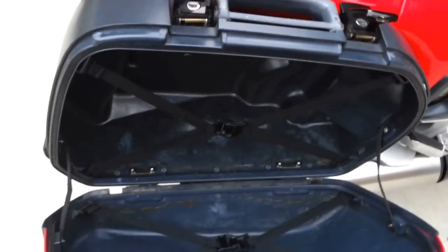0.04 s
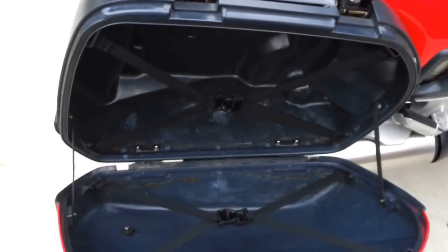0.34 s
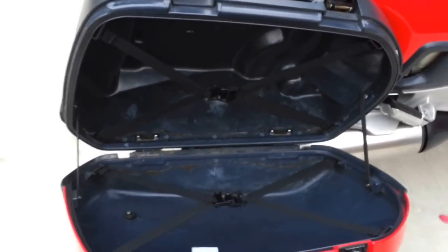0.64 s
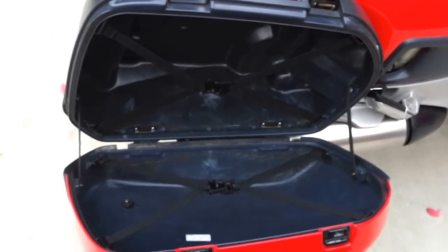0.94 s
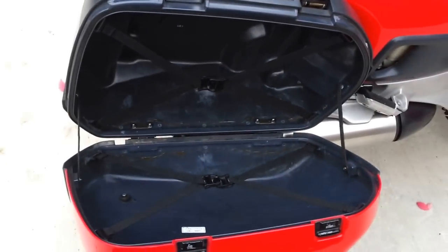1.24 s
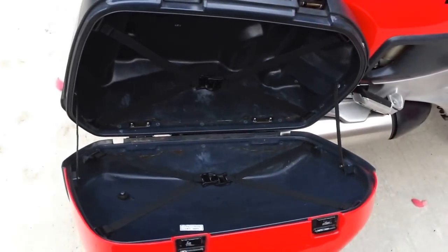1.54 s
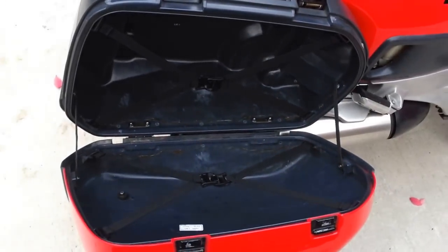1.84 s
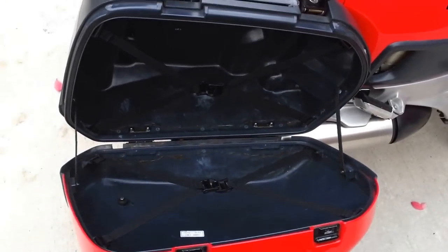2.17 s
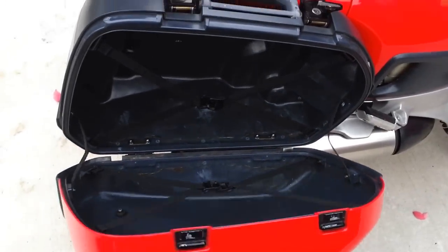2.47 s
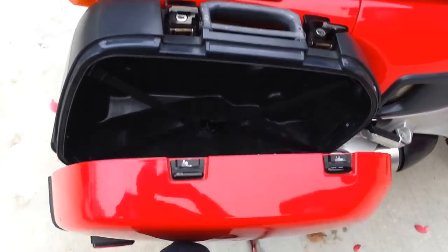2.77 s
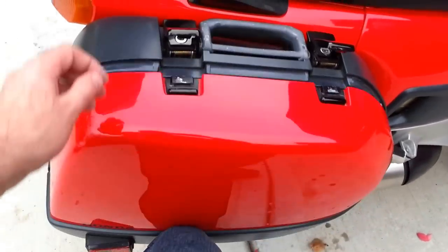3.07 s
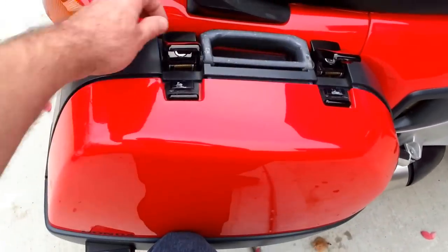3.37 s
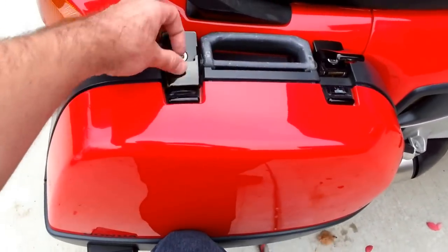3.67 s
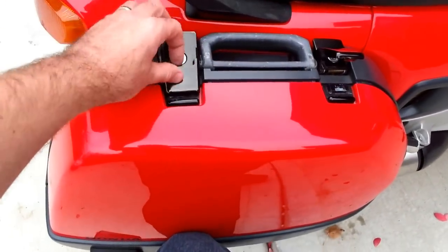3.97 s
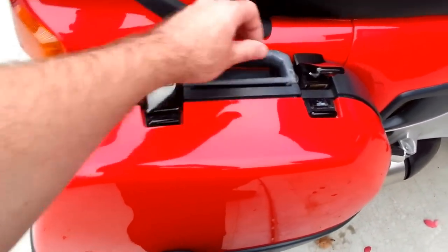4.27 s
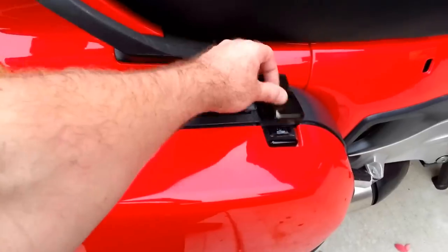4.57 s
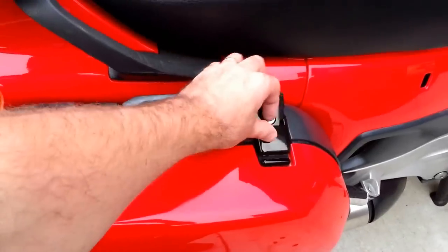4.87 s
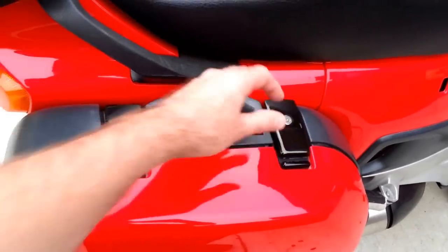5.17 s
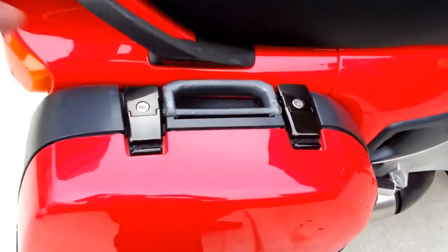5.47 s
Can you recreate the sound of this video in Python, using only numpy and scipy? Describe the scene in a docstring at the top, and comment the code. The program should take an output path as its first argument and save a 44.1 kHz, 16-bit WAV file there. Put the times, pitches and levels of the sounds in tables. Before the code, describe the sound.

A faint outdoor hum and thin hiss run throughout, with soft clothing rustle coming and going. A loose latch gives two tiny clacks at about 0.4 and 1.1 seconds. From 1.8 to 2 seconds the hollow lid of a hard plastic motorcycle saddlebag bumps, with a low boom and a cluster of ticks. It ticks and thuds again around 2.7 seconds as it swings up, then knocks shut with sharp clacks at 3.3 to 3.4 seconds. A metal latch rattles lightly and snaps tight at 3.6 seconds. The second latch clacks and rattles from 4.3 seconds and snaps home at about 4.6. These two snaps are the loudest sounds, overloading the microphone, each with a brief metallic buzz. The bag is an arm's length away, slightly left, and each blow has a short after-ring. Only rustle and hum remain until about 5.5 seconds.

```python
"""First come a faint outdoor hum and hiss, rustling clothes and two tiny clacks of a loose latch. Then, an
arm's length away, the hollow lid of a hard plastic motorcycle saddlebag is bumped, swung up and knocked shut,
booming and ticking. Each of two metal latches is hooked on, rattles, and snaps tight so loudly that its peaks
are flattened. Every blow is a crack, a quickly dying burst of noise and a few ringing tones; the bike and the
walls nearby add a short after-ring."""
import sys
import numpy as np
from scipy import signal
from scipy.fft import rfft, irfft, next_fast_len
from scipy.io import wavfile

SR = 44100
rng = np.random.default_rng(int(sys.argv[2]) if len(sys.argv) > 2 else 0)


def master(y):
    """Save y as 16-bit WAV."""
    cut = np.clip(np.atleast_2d(y).T, -1, 1)
    pcm = np.round(cut * 32767)  # scale
    wavfile.write(sys.argv[1], SR, pcm.astype(np.int16))


N = 243247

EDGES = np.geomspace(28, 16000, 28)   # borders of the frequency bands [Hz]
CENTRES, WIDTHS = np.sqrt(EDGES[1:] * EDGES[:-1]), np.diff(EDGES)
BANK = [signal.butter(2, pair, "band", fs=SR, output="sos") for pair in zip(EDGES, EDGES[1:])]
BASS_HZ, TREBLE_HZ, SHADOW_HZ = 1040, 5200, 1040   # bass ends, treble starts, far side starts to dull
MIDDLING_DB, HALVING_DB = -34, 46   # a medium blow; one this much harder rings half as long


def from_db(db):
    """Turn decibels into a gain to multiply by."""
    return 10 ** (np.asarray(db) / 20)


def at_hz(points, hz):
    """Read a table of (frequency, value) at any frequency, gliding between its rows."""
    frequencies, values = np.array(points).T
    return np.interp(np.log(hz), np.log(frequencies), values)


def above(hz, corner_hz):
    """A smooth step from 0 below the corner frequency to 1 above it."""
    return 1 / (1 + (corner_hz / hz) ** 6)


def dying(t, ring_s):
    """A fade that drops 60 dB in ring_s seconds, the ring time."""
    return np.exp(-np.log(1000) * t / ring_s)


def swell(peak_s, rise_s, fall_s):
    """A gain that rises from 0 to 1 and falls back, in straight lines."""
    return np.interp(np.arange(N) / SR, [peak_s - rise_s, peak_s, peak_s + fall_s], [0, 1, 0])


def wavering(depth_db, count):
    """A gain that wanders through count random values."""
    gains = from_db(depth_db * rng.standard_normal(count))
    return np.interp(np.linspace(0, count - 1, num=N), np.arange(count), gains)


def linger(power, time_s):
    """Smear energy over the time that follows, fading as it goes."""
    kept = np.exp(-1 / (time_s * SR))
    return signal.lfilter([1 - kept], [1, -kept], power + 1e-18)


def unit_energy(x):
    """Scale a stereo sound to an average energy of 1 per channel."""
    return x / np.sqrt(np.sum(x ** 2) / 2 + 1e-20)


def band_noise(k, likeness, size):
    """Stereo noise in band k; a likeness near 1 sounds the same in both ears."""
    run_in = 2000   # samples for the filter to settle
    mid, side = signal.sosfilt(BANK[k], rng.standard_normal((2, size + run_in)))[:, run_in:]
    alike = np.clip(at_hz(likeness, CENTRES[k]), -.99, .99)
    return np.sqrt(1 + alike) * mid + np.sqrt(1 - alike) * side * np.array([[1], [-1]])


def coloured(gain):
    """Stereo noise of average power 1, its tone shaped by gain(hz)."""
    size = next_fast_len(N, real=True)
    hz = np.fft.rfftfreq(size, 1 / SR) + 1
    shaped = rfft(rng.standard_normal((2, size))) * gain(hz)
    return unit_energy(irfft(shaped, size)[:, :N]) * np.sqrt(N)


def add(out, sound, time_s):
    """Mix a sound in at the given time."""
    start = round(time_s * SR)
    out[:, start:start + sound.shape[1]] += sound[:, :N - start]


# how alike both ears hear sound from all around: (frequency [Hz], likeness [-1 to 1])
ALL_AROUND_LIKENESS = [(60, 0.96), (290, 0.86), (640, 0.35), (1400, -0.23), (3000, 0.15), (14000, -0.097)]
# tone of the outdoor air: (frequency [Hz], relative level [dB per Hz])
OUTDOOR_COLOUR = [(15, -74), (25, -53.5), (54, -10), (145, -6.5), (228, -3), (340, -4.5), (368, -10.5),
                  (455, -6.5), (579, -14), (910, -18), (1010, -19.5), (1720, -25.5), (2250, -26.5),
                  (5130, -37.5), (14500, -37.5)]
def hum_and_hiss(hum_db, hiss_db):
    """A distant hum wavers a little under a thin, steady hiss."""
    hum, hiss = 0, 0
    for k, hz in enumerate(CENTRES):
        noise = unit_energy(band_noise(k, ALL_AROUND_LIKENESS, size=N))
        band = from_db(at_hz(OUTDOOR_COLOUR, hz)) * np.sqrt(WIDTHS[k]) * noise
        high = above(hz, corner_hz=1303)
        hum = hum + (1 - high) * band * wavering(depth_db=1.1, count=60)
        hiss = hiss + high * band
    return (from_db(hum_db) * unit_energy(hum) + from_db(hiss_db) * unit_energy(hiss)) * np.sqrt(N)


# dull swells of noise: (peak time [s], rise [s], fall [s], level [dB], centre pitch [Hz])
DULL_SWELLS = [(1.0, 0.4, 0.26, -51.5, 295), (2.1, 0.23, .55, -43.5, 257), (2.3, 0.43, 0.55, -49, 520),
               (4.78, 0.32, 0.49, -46, 252), (5.45, 1, 0.5, -53.5, 500)]
def low_swells(width_octaves):
    """Soft humps of low noise come and go, alike in both ears."""
    out = 0
    for peak_s, rise_s, fall_s, level_db, centre_hz in DULL_SWELLS:
        noise = coloured(lambda hz: np.exp(-(np.log2(hz / centre_hz) / width_octaves) ** 2))[0]
        out = out + from_db(level_db) * swell(peak_s, rise_s, fall_s) * noise
    return out


# tone of rubbing cloth: (frequency [Hz], relative level [dB per Hz])
CLOTH_COLOUR = [(300, -30), (700, 0.5), (1300, -3), (2400, 0), (3000, -0.5), (3700, -0.5), (4250, -4),
                (4900, -5.5), (6000, -16), (14000, -24)]
# the person's movements: (peak time [s], rise [s], fall [s], rubbing level [dB], swish level [dB])
BODY_MOVES = [(.05, 0.34, 0.57, -51, -64), (2.78, 1, 0.84, -54, -57.5), (3.92, 0.67, 0.47, -53.5, -59),
              (4.74, 0.21, .3, -51, -55.5), (5.43, 0.56, 0.5, -47, -63)]
def clothes():
    """Cloth slides in small uneven catches under a fine swish; each move swells and fades."""
    rubbing = coloured(lambda hz: from_db(at_hz(CLOTH_COLOUR, hz))) * wavering(depth_db=2.5, count=450)
    swish = coloured(lambda hz: above(hz, corner_hz=6800))
    return sum(swell(peak_s, rise_s, fall_s) * (from_db(rub_db) * rubbing + from_db(swish_db) * swish)
               for peak_s, rise_s, fall_s, rub_db, swish_db in BODY_MOVES)


# how long the bike and the walls nearby ring on: (frequency [Hz], ring time [s])
AFTER_RING_TIMES = [(150, 0.5), (400, 0.43), (1500, 0.33), (4500, 0.31), (12000, 0.2)]
# how much sound they send back: (frequency [Hz], level [dB])
AFTER_RING_LEVELS = [(100, -10.5), (300, -11), (700, -13.5), (1800, -13), (4500, -18.5), (7000, -17),
                     (13000, -18.5)]
def after_ring(sound, build_s):
    """The bike and the walls send each blow back as a wash that builds up and dies away."""
    out, mono = 0, sound.mean(axis=0) + 1e-18
    lowest_hz = AFTER_RING_LEVELS[0][0]
    for k, hz in enumerate(CENTRES):
        if hz > lowest_hz:
            power = linger(signal.sosfilt(BANK[k], mono) ** 2, build_s)
            power = linger(power, at_hz(AFTER_RING_TIMES, hz) / np.log(1e6))
            wash = unit_energy(band_noise(k, ALL_AROUND_LIKENESS, size=N))
            out = out + from_db(at_hz(AFTER_RING_LEVELS, hz)) * np.sqrt(N * power) * wash
    return out * wavering(depth_db=1.5, count=1100)   # few surfaces outdoors: echoes come in clumps


# A blow is (time [s], level [dB], extra bass [dB], extra treble [dB], ring length [factor],
# left over right [dB], pitch of the struck spot [Hz], extra level of that spot [dB]).
def strength(blow, hz):
    """Left and right gain of a blow at one frequency; only high sounds are shadowed on the right."""
    level_db, bass_db, treble_db, _, left_db = blow[1:6]
    tone_db = level_db + bass_db * (1 - above(hz, BASS_HZ)) + treble_db * above(hz, TREBLE_HZ)
    side_db = left_db * above(hz, SHADOW_HZ) * np.array([[.5], [-.5]])
    return from_db(tone_db + side_db)


def ring_length(level_db):
    """The harder two parts are pressed together, the sooner their ring dies."""
    return 2 ** ((MIDDLING_DB - level_db) / HALVING_DB)


# how alike both ears hear sound straight from the bag: (frequency [Hz], likeness [-1 to 1])
BAG_LIKENESS = [(300, 1), (800, 0.86), (1500, 0.48), (3000, 0.26), (5000, 0.067), (12000, 0.12)]
# how fast the plastic goes quiet: (frequency [Hz], ring time before stretching [s])
PANEL_RING_TIMES = [(100, 0.15), (280, 0.049), (700, 0.071), (1800, 0.03), (4500, 0.025), (12000, 0.015)]
def panels(blows, colour, rise_s, stretch, crack_db):
    """Struck plastic cracks, then countless tones blur into a burst that dies fastest in the treble."""
    out, t = np.zeros((2, N)), np.arange(SR // 7) / SR
    shares = from_db(at_hz(colour, CENTRES)) * np.sqrt(WIDTHS)   # each band's part of the sound
    shares *= np.sqrt(SR / 100) / np.linalg.norm(shares)
    for k, hz in enumerate(CENTRES):
        crack = (-1) ** k * signal.sosfilt(BANK[k], (t == 0) + 1e-18)
        crack *= from_db(crack_db) / np.linalg.norm(crack)
        for blow in blows:
            time_s, length = blow[0], blow[4]
            ring_s = at_hz(PANEL_RING_TIMES, hz) * stretch * length
            envelope = (1 - np.exp(-t / rise_s)) * dying(t, ring_s)
            burst = unit_energy(band_noise(k, BAG_LIKENESS, size=len(t)) * envelope)
            add(out, shares[k] * strength(blow, hz) * (burst + above(hz, BASS_HZ) * crack), time_s)
    return out


def ringing(blows, tones, level_db, scatter_db):
    """A struck part rings at its natural pitches; each blow wakes each one by a chance amount."""
    out, t = np.zeros((2, N)), np.arange(SR // 2) / SR
    luck_db = scatter_db * rng.standard_normal((len(blows), len(tones)))
    for k, (hz, tone_db, ring_s) in enumerate(tones):
        tone = (-1) ** k * np.sin(2 * np.pi * hz * t) * dying(t, ring_s)
        for blow, luck in zip(blows, luck_db):
            add(out, from_db(level_db + tone_db + luck[k]) * strength(blow, hz) * tone, blow[0])
    return out


def struck_spots(blows, base_cycles=47.4):
    """The spot that is hit rings at its own pitch: low for a panel, high for a lever."""
    out, t = np.zeros((2, N)), np.arange(SR // 2) / SR
    for blow in blows:
        time_s, _, _, _, length, _, hz, spot_db = blow
        onset = 1 - np.exp(-2 * hz * t)   # the contact lasts about half a cycle
        tone = np.sin(2 * np.pi * hz * t) * onset * dying(t, length * base_cycles / hz)
        add(out, from_db(spot_db) * strength(blow, hz) * tone, time_s)
    return out


# tone of a knock on the lid: (frequency [Hz], relative level [dB per Hz])
KNOCK_COLOUR = [(70, -34), (130, -23), (200, 13.5), (320, 1.5), (520, 1.5), (780, -5.5), (1200, -8.5),
                (2000, -12.5), (3600, -13.5), (5500, -29), (9000, -33.5), (14500, -54)]
# natural tones of the open lid: (pitch [Hz], relative level [dB], ring time [s])
LID_TONES = [(160, -22, 0.077), (205, -17, 0.66), (230, -13, 0.28), (292, -15, 0.3), (478, -9.5, 0.074),
             (720, -7.5, 0.11), (812, -39, 0.1)]
# the lid bumping at the end of its straps and as it is swung up:
# (time [s], level [dB], ring length [factor], pitch of the struck spot [Hz])
THUDS = [(1.836, -44, 0.63, 170), (1.972, -34.5, 0.79, 230), (1.974, -37, 0.81, 788),
         (1.989, -43, 1.8, 294.2), (2.695, -36, 0.15, 189), (2.975, -49.5, 0.47, 319)]
# its hinges and rim ticking: (time [s], level [dB], extra treble [dB])
TICKS = [(1.847, -31.5, -5), (1.855, -30.5, -3), (1.867, -20, -11), (1.885, -28, -13), (1.909, -35.5, -18),
         (1.958, -24.5, -3), (1.964, -22.5, -1), (2.069, -42, 2), (2.490, -42.5, 2), (2.658, -32, 1),
         (2.673, -25.5, 2), (2.691, -23.5, 6.5), (2.697, -21, -1), (2.715, -26, 0)]
def lid():
    """Plastic knocks on plastic with a hollow boom. Returns the whole lid and the struck spots."""
    bass_db, treble_db, left_db, spot_db = 10.5, 7, 6, 6.5
    blows = [(time_s, db, bass_db, treble_db, length, left_db, hz, spot_db)
             for time_s, db, length, hz in THUDS]
    tick_left_db, hinge_hz, hinge_db = 11.5, 3550, -17
    for time_s, db, tick_treble_db in TICKS:
        tick_bass_db = 1 + 0.41 * (MIDDLING_DB - db)   # gentler ticks are duller
        length = 0.92 * ring_length(db)
        blows.append((time_s, db, tick_bass_db, tick_treble_db, length, tick_left_db, hinge_hz, hinge_db))
    boom = ringing(blows, LID_TONES, level_db=-3, scatter_db=5.0)
    plastic = panels(blows, KNOCK_COLOUR, rise_s=0.0013, stretch=2.5, crack_db=-13.5)
    return boom + plastic, struck_spots(blows)


# natural tones of a metal latch: (pitch [Hz], relative level [dB], ring time [s])
METAL_TONES = [(1650, -16.5, 0.07), (1750, -23.5, 0.06), (1857, -9, 0.035), (2200, -23.5, 0.04),
               (2210, -13, 0.032), (2670, -10.5, 0.039), (2965, -23, 0.05), (3190, -25, 0.05),
               (3700, -23, 0.05), (4170, -20, 0.031), (4440, -19, 0.034), (4600, -24, 0.045),
               (5350, -19.5, 0.04)]
# natural tones of the closed bag's shell: (pitch [Hz], relative level [dB], ring time [s])
SHELL_TONES = [(202, -23, 0.22), (282.5, -14.5, 0.16), (403, -18, 0.085), (438, -19, 0.11),
               (490, -21, 0.07), (560, -14, 0.076), (615, -24.5, 0.023), (719, -13.5, 0.099),
               (740, -10, 0.09), (930, -14.5, 0.056), (1010, -18.5, .06), (1416, -13.5, 0.055)]
def latch_and_shell(blows, metal_db, metal_scatter_db, shell_db, shell_scatter_db):
    """A blow rings both the metal latch and the hollow shell it sits on."""
    metal = ringing(blows, METAL_TONES, metal_db, metal_scatter_db)
    return metal + ringing(blows, SHELL_TONES, shell_db, shell_scatter_db)


# tone of a sharp clack: (frequency [Hz], relative level [dB per Hz])
SHARP_CLACK_COLOUR = [(70, -23.5), (270, -5), (500, -4), (800, -2.5), (1150, -9), (1900, -1.5),
                      (2700, -3.5), (4000, -10), (5200, -19), (6200, -36), (7400, -20), (9300, -29.5),
                      (11500, -23.5), (14500, -43.5)]
# sharp clacks of the lid meeting its rim and of the latch levers: (time [s], level [dB],
# extra bass [dB], extra treble [dB], pitch of the struck spot [Hz], extra level of that spot [dB])
CLACKS = [(0.392, -50, 0, 6, 3600, 5), (1.124, -52.5, 17.5, 8, 3700, 8.5),
          (3.2793, -19, -2.5, 0.5, 1930, 5.5), (3.366, -33, 11, -4.5, 2350, 2),
          (3.3844, -13.5, 5.5, 3.5, 1867, 9.5), (3.395, -15, -4.5, -26, 2100, 9),
          (3.466, -41, -2, -3, 3780, 5.5), (3.532, -38, 9.5, 9.5, 6930, -4.5),
          (3.571, -35.5, 7.5, -41, 1800, 3.5), (3.691, -33, 0, -17.5, 1770, 4),
          (4.2723, -28.5, -1, -12.5, 1870, 2), (4.288, -12, 0, 1.5, 1660, -8),
          (4.2957, -16, 4.5, -1, 2290, 7.5), (4.374, -35, -2, -15, 2290, 1), (4.437, -27, 0, -12, 2320, 1),
          (4.459, -28, 1.5, -23, 206, -4)]
def sharp_clacks(left_db):
    """The lid or a lever clacks brightly and shakes the shell. Returns that and the struck spots."""
    blows = [(time_s, db, bass_db, treble_db, 1.48 * ring_length(db), left_db, hz, spot_db)
             for time_s, db, bass_db, treble_db, hz, spot_db in CLACKS]
    ring = latch_and_shell(blows, metal_db=-2.0, metal_scatter_db=6.5, shell_db=-6.5, shell_scatter_db=3.5)
    plastic = panels(blows, SHARP_CLACK_COLOUR, rise_s=0.00017, stretch=0.89, crack_db=-12)
    return ring + from_db(-2.5) * plastic, struck_spots(blows)


# tone of a latch's snap: (frequency [Hz], relative level [dB per Hz])
TIGHT_LATCH_COLOUR = [(70, -20.5), (150, -8.5), (280, 1.5), (500, -3), (720, 4), (1100, -22.5), (1750, -2),
                      (2900, -7), (4400, -6), (6000, -18.5), (9000, -23), (12000, -17.5), (14500, -22.5)]
# levers snapping past their tipping point and pulling the shell tight: (time [s], level [dB],
# extra bass [dB], extra treble [dB], ring length [factor], left over right [dB])
SNAPS = [(3.6124, -4, -2, -1, 0.96, 9.5), (4.5527, -5, 3.5, 3.5, 0.62, 12)]
def latch_snaps(spot_hz, spot_db):
    """A taut lever slams home and drives the whole shell. Returns that and the struck spots."""
    blows = [(*snap, spot_hz, spot_db) for snap in SNAPS]   # each snap adds a short metallic ring
    ring = latch_and_shell(blows, metal_db=-5, metal_scatter_db=7, shell_db=-1.5, shell_scatter_db=0.5)
    plastic = panels(blows, TIGHT_LATCH_COLOUR, rise_s=0.00078, stretch=1.67, crack_db=-9.0)
    return ring + from_db(-0.5) * plastic, struck_spots(blows)


def lever_buzz(relative_db, taps_per_s, ring_s, lowest_hz):
    """After a snap the lever buzzes on its pin: a dying spray of tiny bright taps."""
    out, t = np.zeros((2, N)), np.arange(SR // 4) / SR
    bright = signal.butter(2, lowest_hz, "high", fs=SR, output="sos")
    for time_s, snap_db, *_ in SNAPS:
        taps = (rng.random(len(t)) < taps_per_s / SR) * rng.standard_normal((2, len(t)))
        spray = unit_energy(signal.sosfilt(bright, taps + 1e-18)) * np.sqrt(len(t))
        add(out, from_db(snap_db + relative_db) * dying(t, ring_s) * spray, time_s)
    return out


def scene():
    """Mix the outdoors, the person's clothes and the bag with its short after-ring."""
    knocks, lid_spots = lid()
    clacks, clack_spots = sharp_clacks(left_db=9.5)
    snaps, snap_spots = latch_snaps(spot_hz=1750, spot_db=-5.5)
    sent_out = from_db(-1.0) * knocks + from_db(0.3) * clacks + from_db(-0.4) * snaps
    echoes = after_ring(sent_out, build_s=0.0045)
    outdoors = hum_and_hiss(hum_db=-47.5, hiss_db=-57) + low_swells(width_octaves=.8)
    buzz = lever_buzz(relative_db=-23.5, taps_per_s=1000, ring_s=0.12, lowest_hz=3480)
    bag = knocks + lid_spots + clacks + clack_spots + snaps + snap_spots + buzz + echoes
    bass_cut = signal.butter(2, 114.3, "high", fs=SR, output="sos")   # the bag sounds carry no deep bass
    return outdoors + clothes() + signal.sosfilt(bass_cut, bag + 1e-18)


def record(dry):
    """The loudest snaps are flattened at full scale, and the highest treble is cut away."""
    clipped = np.clip(dry, -1, 1)
    treble_cut = signal.ellip(10, .2, 80, 14700, fs=SR, output="sos")
    return signal.sosfilt(treble_cut, clipped)


dry = scene()
out = record(dry)
master(out)
```